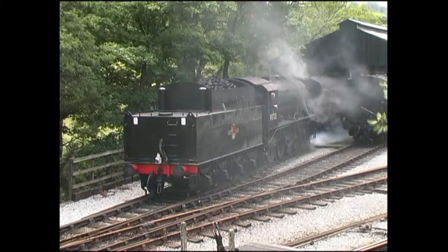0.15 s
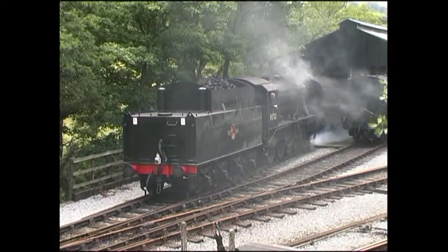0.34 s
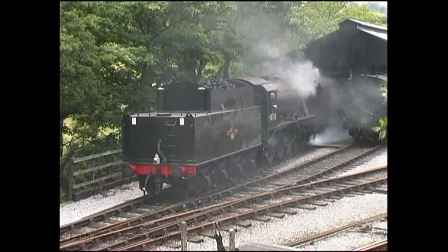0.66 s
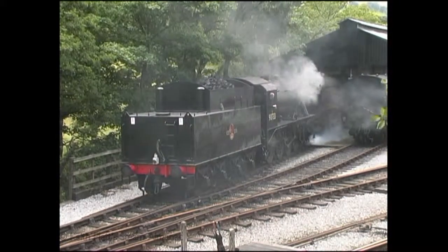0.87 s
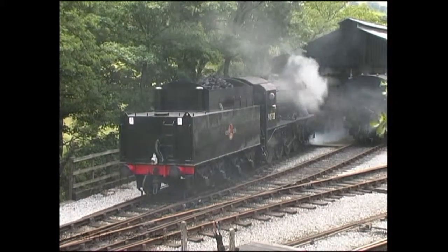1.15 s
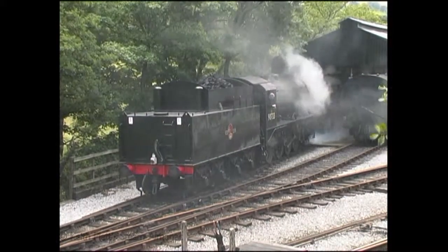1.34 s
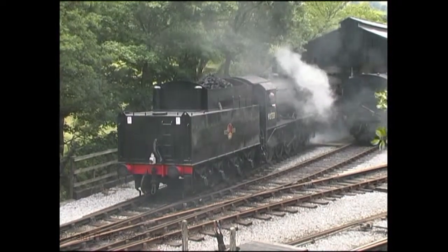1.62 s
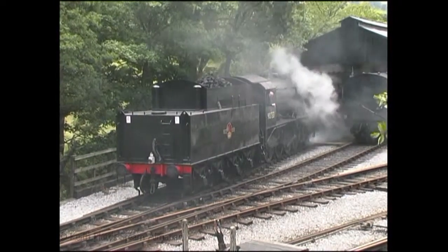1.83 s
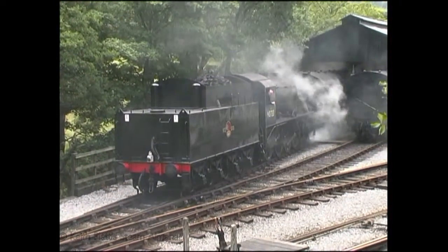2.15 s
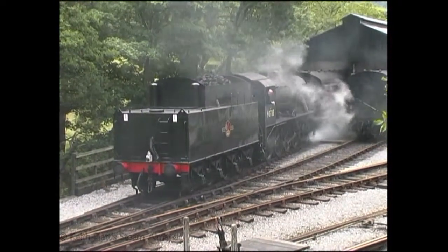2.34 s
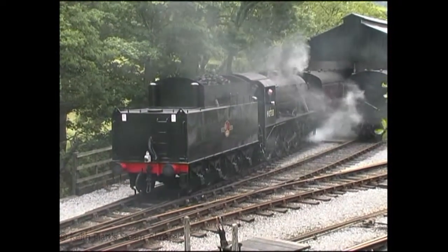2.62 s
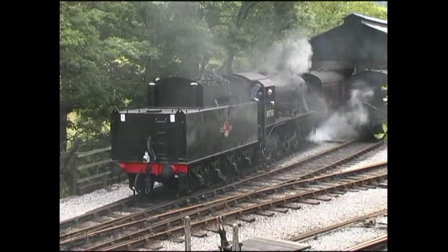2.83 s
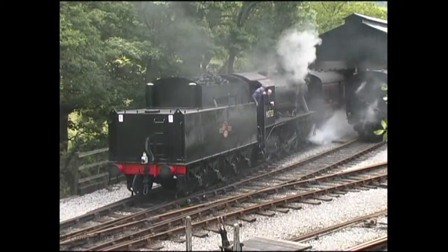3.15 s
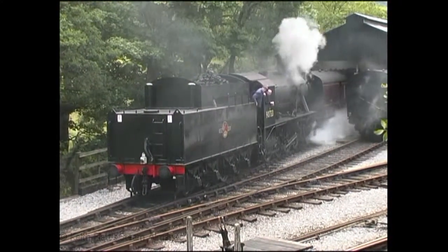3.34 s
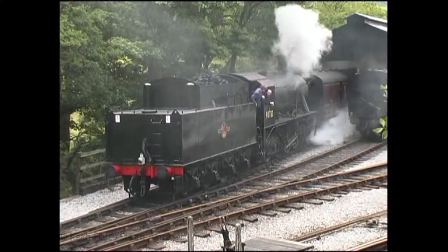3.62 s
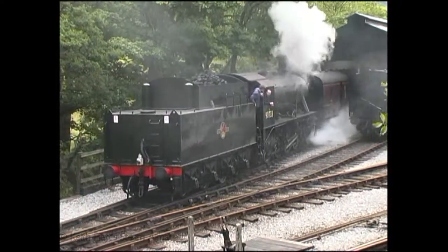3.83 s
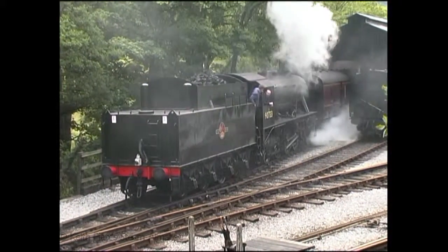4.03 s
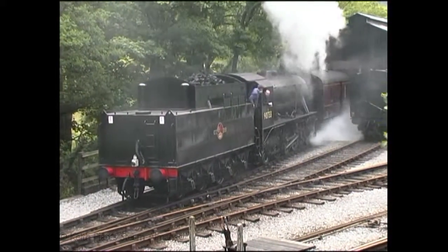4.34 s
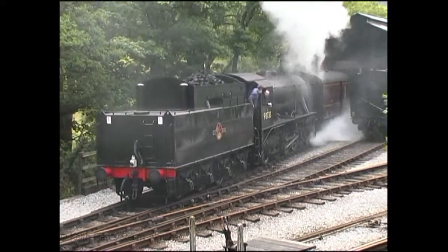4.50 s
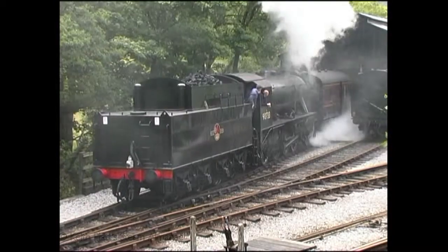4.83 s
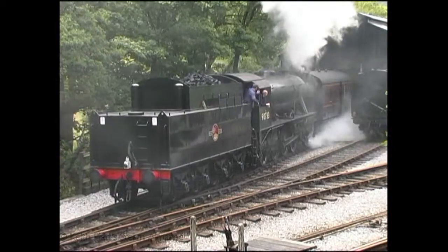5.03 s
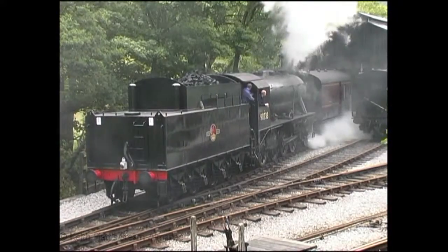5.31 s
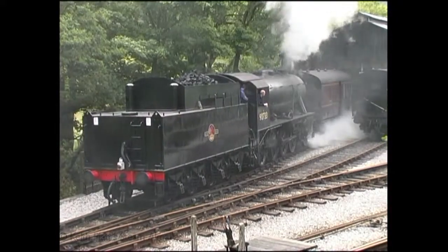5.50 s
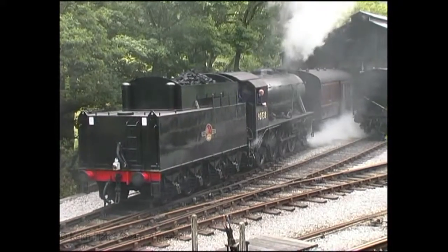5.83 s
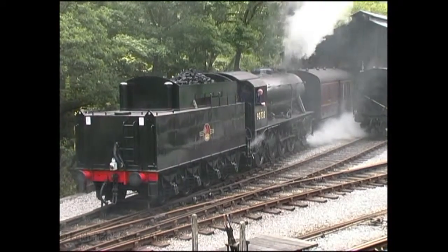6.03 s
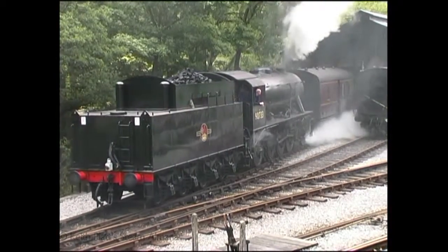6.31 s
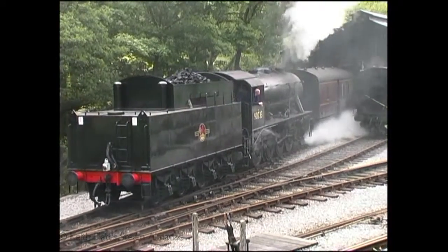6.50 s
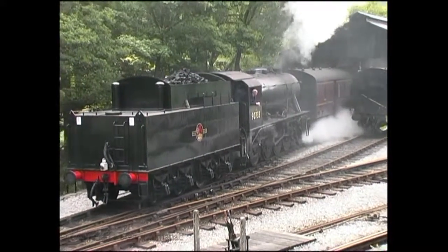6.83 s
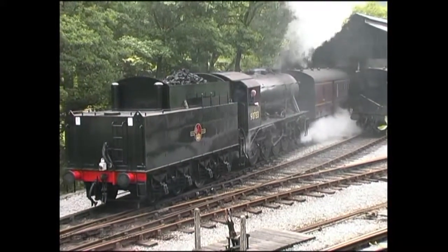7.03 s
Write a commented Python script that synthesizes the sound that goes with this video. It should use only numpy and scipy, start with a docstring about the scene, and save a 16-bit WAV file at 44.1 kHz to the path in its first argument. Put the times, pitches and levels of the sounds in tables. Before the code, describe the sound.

A steam locomotive, heard from some way off in a rail yard, lets out a loud, bright, turbulent hiss over a duller jet of steam. About halfway through, the bright hiss dies away while the duller one keeps blowing. The train creeps off with a quiet low wheel rumble and soft, irregular, humming knocks. Near the end a wheel flange gives a faint, very high squeal.

```python
"""Steam roars from a standing locomotive, some way off in a murmuring rail yard. A bright turbulent jet
from a boiler valve starts to close at 3.5 s; duller steam blows from the cylinder cocks throughout.
As the train creeps off, the wheels rumble over the rails, the frames judder in soft knocks that set
their modes humming, and a flange rubbing the rail briefly sings very high."""
import sys
import numpy as np
from scipy import signal
from scipy.fft import rfft, irfft, next_fast_len
from scipy.io import wavfile
from scipy.ndimage import uniform_filter1d, map_coordinates

SR = 44100
rng = np.random.default_rng(int(sys.argv[2]) if len(sys.argv) > 2 else 0)


def materialize(psi):
    """Save the field psi as 16-bit PCM at rate SR to the path in sys.argv[1].

    A 1-D psi becomes a single channel; in a 2-D psi each row is a channel.
    """
    bounded = np.clip(np.atleast_2d(psi).T, -1, 1)
    quanta = np.round(bounded * 32767).astype(np.int16)
    wavfile.write(sys.argv[1], SR, quanta)


N = 315756
TIME_S = np.arange(N) / SR


def amp(db):
    """Decibels to gain."""
    return 10 ** (np.asarray(db) / 20)


def unit(x):
    """Scale to rms 1."""
    return x / np.sqrt(np.mean(x ** 2) + 1e-20)


def along(points, hz):
    """Read (Hz, value) points on a log axis."""
    knots_hz, values = np.transpose(points)
    return np.interp(np.log(hz + 1), np.log(knots_hz + 1), values)


def curves(rows, at_s=TIME_S):
    """Interpolate each column after the time."""
    knots_s, *columns = np.transpose(rows)
    return [np.interp(at_s, knots_s, column) for column in columns]


def wobble(rate_hz):
    """Smooth random curve, rate_hz knots a second."""
    knots = rng.standard_normal(int(N * rate_hz / SR) + 4)
    return map_coordinates(knots, [TIME_S * rate_hz])


def field(shape, bins, frames):
    """Smooth random time-frequency surface, rms 1."""
    white = rng.standard_normal(shape)
    return unit(uniform_filter1d(uniform_filter1d(white, bins, 0), frames, 1))


def filtered(x, response):
    """Apply a complex frequency response."""
    size = next_fast_len(N + SR // 2)
    return irfft(rfft(x, size) * response(np.fft.rfftfreq(size, 1 / SR)), size)[..., :N]


def noise(spectrum):
    """Two independent noises of one colour, rms 1."""
    return unit(filtered(rng.standard_normal((2, N)), lambda hz: amp(along(spectrum, hz))))


def jet(spectrum, flow, pivot_hz, eddy_db, ripple_db, flutter_db, bands_hz=(), band_swell=()):
    """Turbulent steam: the hiss follows separate level and tilt curves; eddies patch its gain."""
    window = dict(nperseg=2048, noverlap=1536)
    hz, frame_s, spectra = signal.stft(noise(spectrum), SR, **window)
    hz = hz[:, None]
    level_db, tilt_db_per_oct = curves(flow, frame_s)
    gain_db = level_db + tilt_db_per_oct * np.log2(np.maximum(hz, 600) / pivot_hz)
    if bands_hz:
        for (centre_hz, half_width_hz), boost_db in zip(bands_hz, curves(band_swell, frame_s)):
            gain_db += boost_db * np.exp(-((hz - centre_hz) / half_width_hz) ** 2)
    gain_db += eddy_db * field(gain_db.shape, bins=24, frames=4)
    gain_db += ripple_db * field(gain_db.shape, bins=3, frames=24)  # faint, slowly shifting tonal grain
    hiss = signal.istft(spectra * amp(gain_db), SR, **window)[1][:, :N]
    return amp(flutter_db * wobble(10)) * hiss


# Valve jet colour. Each row: frequency in Hz, relative density in dB.
VALVE_SPECTRUM = [(900, -90), (1500, -25), (2100, -11.5), (2600, -6), (3500, -2.5), (4100, -4),
                  (4700, -3.5), (5050, -6.5), (5350, -2), (6000, -3.5), (7000, -8), (8500, -13),
                  (10000, -20), (12000, -30), (14000, -41), (15600, -61)]
# Valve flow. Each row: time in seconds, level in dB, tilt in dB per octave.
VALVE_FLOW = [(0, -16.5, 2.2), (0.15, -16.5, 2.5), (0.43, -14, 4), (0.66, -15, 1), (0.81, -15.5, 0),
              (1.04, -15.5, 5.5), (1.18, -15, 2), (1.32, -16, 1.5), (1.6, -15.5, 4), (1.87, -17, 2),
              (2.03, -17, 4.5), (2.28, -17, -2), (2.45, -16.5, 1.5), (2.73, -18, 3), (2.93, -16, 2.5),
              (3.2, -16, 0.5), (3.5, -16.5, 0), (3.7, -20, 1.5), (4.1, -22.5, 1.5), (4.4, -25.5, -0.5),
              (4.85, -27, -2), (5.35, -30, -1.5), (5.55, -38.5, 3.5), (6.3, -34.5, 1.5), (7.16, -45, -5)]


def boiler_valve():
    """A bright jet that dies away as the valve closes."""
    return jet(VALVE_SPECTRUM, VALVE_FLOW, pivot_hz=4560, eddy_db=1.5, ripple_db=2.1, flutter_db=.5)


# Cock jet colour. Each row: frequency in Hz, relative density in dB.
COCK_SPECTRUM = [(300, -78), (600, -29), (850, -12.5), (950, -14.5), (1400, -8), (1580, -9.5),
                 (1980, -10.5), (2100, -5.5), (2700, -5), (3300, -6.5), (4900, -12.5), (6200, -15),
                 (8500, -29.5), (12000, -45), (15600, -60)]
# Cock flow. Each row: time in seconds, level in dB, tilt in dB per octave.
COCK_FLOW = [(0, -20.5, 2.5), (0.5, -23.5, 1.5), (1.1, -25, 1), (1.7, -23.5, 3), (2.25, -21, 1.5),
             (2.75, -19, 2), (3.25, -21.5, 1.5), (3.75, -23, 2), (4.05, -22.5, 2), (4.3, -24.5, -0.5),
             (4.65, -28, -2), (5.25, -26, -1.5), (5.5, -26, -0.5), (5.75, -24.5, -0.5), (6.0, -26, -0.5),
             (6.5, -26, 0), (7.16, -25, 0)]
# Drain pipe resonances. Each row: time in seconds, lower band gain in dB, upper band gain in dB.
PIPE_BAND_GAINS = [(0, 3, -4.5), (2.2, -1, -1), (4.0, 3.5, 0.5), (5.0, 2.5, 0.5), (5.7, 4, 1), (6.4, 5, 1),
                   (7.16, 3.5, 3.5)]


def cylinder_cocks():
    """A duller jet; its drain pipe favours two bands, which stand out more as the engine nears."""
    return jet(COCK_SPECTRUM, COCK_FLOW, pivot_hz=2190, eddy_db=.95, ripple_db=1.95, flutter_db=.22,
               bands_hz=[(2210, 155), (3600, 500)], band_swell=PIPE_BAND_GAINS)


# Background colour. Each row: frequency in Hz, relative density in dB.
MURMUR_SPECTRUM = [(12, -35), (20, -15.5), (167, -11), (293, -5.5), (330, -13.5), (406, -6.5), (470, -10),
                   (506, -5.5), (570, -9), (680, -13), (880, -20), (1500, -120)]
# Background swell. Each row: time in seconds, gain in dB.
MURMUR_SWELL = [(0, 2), (1.2, -1), (3.2, 2), (7.16, -10)]


def yard_murmur(base_db=-56):
    """Low murmur of the distant yard and trees."""
    swell_db, = curves(MURMUR_SWELL)
    return amp(base_db + swell_db) * noise(MURMUR_SPECTRUM)


# Colour of wheel rumble and frame thuds. Each row: frequency in Hz, relative density in dB.
RUMBLE_SPECTRUM = [(18, -47), (30, -27), (69, -4.5), (156, -1), (211, 2), (259, 1), (294, -2.5), (346, -4),
                   (398, -5), (435, 0), (620, -14.5), (810, -50), (1360, -120)]
# Wheel rumble. Each row: time in seconds, level in dB.
WHEEL_LEVELS = [(3.45, -75), (3.72, -54.5), (4.3, -51), (4.62, -40), (4.72, -41.5), (4.95, -52),
                (5.15, -42.5), (5.38, -50.5), (5.68, -40.5), (5.82, -46.5), (6.12, -43.5), (6.3, -47),
                (6.55, -49), (6.75, -53), (7.16, -47.5)]
# Ground rumble colour. Each row: frequency in Hz, relative density in dB.
GROUND_SPECTRUM = [(18, -40), (30, -12), (60, -1), (110, -4), (170, -17), (300, -120)]
MOVE_OFF_S, ROLL_FREE_S, JUDDER_END_S = 3.69, 4.42, 6.6


def rolling_wheels(ground_db=-64, nearing_db_per_s=2):
    """Wheels grind over the rails in lumps; the ground rumble grows as the engine nears."""
    moving_s = TIME_S - MOVE_OFF_S
    ground = (moving_s > 0) * amp(ground_db + nearing_db_per_s * moving_s) * noise(GROUND_SPECTRUM)
    level_db, = curves(WHEEL_LEVELS)
    grind = unit(amp(3.5 * wobble(28)) * noise(RUMBLE_SPECTRUM))
    return amp(level_db) * grind + ground


# Judder slips. Each row: start in seconds, level in dB, third mode over second in dB.
JUDDER_SLIPS = [(3.69, -40, -7), (3.767, -47, -1), (3.859, -41, -5), (3.935, -45, 0), (4.076, -41, -3),
                (4.149, -60, 8), (4.221, -39.5, 1), (4.299, -64, 3), (4.373, -40, -2), (4.443, -39, -1),
                (4.491, -40, 0), (4.522, -34, -5), (4.579, -36, -8), (4.609, -44, -5), (4.645, -39, -1),
                (4.699, -36, -8), (4.819, -42, -11), (5.069, -41, -4), (5.153, -37, -1), (5.213, -44, 16),
                (5.267, -50, -2), (5.499, -50, -2), (5.577, -40, 8), (5.624, -44, -1), (5.709, -44, 2),
                (5.819, -43.5, -16), (5.929, -40, -11), (6.029, -44, -7), (6.084, -32.5, 1),
                (6.221, -34, 0), (6.289, -51, 4), (6.359, -46, 0), (6.446, -54, 2), (6.532, -49, 5)]
# Frame modes. Each row: frequency in Hz, T60 in seconds, base wander in Hz, relative hum in dB.
FRAME_MODES = [(135, .16, 4, -5), (280, .16, 5, 0), (416, .2, 4, -1), (525, .12, 8, -12)]


def frame_knocks(low_mode_db=-3.5, top_mode_db=-5, thud_db=-6, scatter_db=1,
                 hum_db=-59, hum_fade_db_per_s=1.5):
    """Each slip of the judder is a soft push: a short thud, and fresh energy for the humming modes."""
    start_s, slip_db, tilt_db = np.transpose(JUDDER_SLIPS)
    age_s = np.arange(SR // 2) / SR

    def ramp(from_s, edge_s=.06):
        return np.clip((TIME_S - from_s) / edge_s, 0, 1)

    def envelope(level_db, t60_s, rise_s):
        pushes = np.bincount(np.round(start_s * SR).astype(int), amp(level_db), N)
        response = amp(-60 * age_s / t60_s) * (1 - np.exp(-age_s / rise_s))
        return signal.fftconvolve(pushes, response)[:N]

    juddering = ramp(MOVE_OFF_S) - ramp(JUDDER_END_S)
    hum = juddering * amp(hum_db - hum_fade_db_per_s * (TIME_S - MOVE_OFF_S))
    wander_scale = 2.6 ** ramp(ROLL_FREE_S)
    chance_db = scatter_db * rng.standard_normal((len(start_s), len(FRAME_MODES))).T
    shares_db = [low_mode_db + chance_db[0], -tilt_db / 2,
                 tilt_db / 2, tilt_db / 2 + top_mode_db + chance_db[3]]
    ring = np.zeros(N)
    for (hz, t60_s, wander_hz, held_db), share_db in zip(FRAME_MODES, shares_db):
        pitch_hz = hz + wander_hz * wander_scale * wobble(45)
        phase = 2 * np.pi * (np.cumsum(pitch_hz) / SR + rng.random())
        struck = envelope(slip_db + share_db, t60_s, rise_s=.004)
        held = hum * amp(held_db + 3.5 * wobble(14))
        ring += (struck + held) * np.sin(phase)
    shed_echo = .26 * np.pad(ring, (400, 0))[:N]
    thud = envelope(slip_db + thud_db, t60_s=.06, rise_s=.002) * noise(RUMBLE_SPECTRUM)
    return np.array([ring, shed_echo]) + thud


# Flange squeal. Each row: time in seconds, pitch in Hz, level in dB.
SQUEAL_PATH = [(5.15, 10400, -69), (5.4, 10250, -60), (5.7, 10050, -60), (5.84, 10000, -53),
               (6.0, 10150, -56), (6.17, 10280, -54), (6.35, 10300, -56), (6.7, 10300, -69)]


def flange_squeal():
    """A flange rubs the rail: narrow noise around a drifting pitch."""
    pitch_hz, level_db = curves(SQUEAL_PATH)
    carrier = np.sin(2 * np.pi * np.cumsum(pitch_hz) / SR)
    gain = amp(level_db + 1.8 * wobble(20))
    return gain * unit(carrier * np.array([wobble(330), wobble(330)]))


# Channel likeness. Each row: frequency in Hz, left-right coherence from 0 to 1.
STEREO_COHERENCE = [(40, .88), (90, 1), (300, 1), (345, .89), (430, 1), (580, 0.34), (730, 0.84), (1100, 1),
                    (1720, 0.76), (2150, 0.91), (3200, 0.75), (5000, 0.7), (7000, 0.5), (15000, 0.56)]
# Channel balance. Each row: frequency in Hz, left minus right level in dB.
STEREO_BALANCE = [(40, 1), (130, -1), (300, -2), (430, -4.5), (560, -9.5), (730, -2.5), (1290, -3.5),
                  (1720, -1), (2150, -2.5), (3200, -1.5), (5400, -3), (8600, 0.5), (15000, 1)]
# Channel phase. Each row: frequency in Hz, left minus right phase in radians.
STEREO_PHASE = [(40, 0), (300, -.5), (470, -.8), (560, -2.2), (605, -4.5), (730, -5.4), (1030, -5.9),
                (2150, -6.3), (6000, -6.1), (12000, -6.3)]


def stereo(pair):
    """Mix direct and scattered sound as mid and side, then offset channel level and phase."""
    def blend(hz):
        angle = np.arccos(np.clip(along(STEREO_COHERENCE, hz), -1, 1)) / 2
        return np.array([np.cos(angle), np.sin(angle)])

    def lean(hz):
        left = amp(along(STEREO_BALANCE, hz) / 2) * np.exp(.5j * along(STEREO_PHASE, hz))
        return np.array([left, 1 / left])

    mid, side = filtered(pair, blend)
    return filtered(np.array([mid + side, mid - side]), lean)


def scene():
    """Everything arrives from the same side of the yard."""
    steam = boiler_valve() + cylinder_cocks()
    motion = rolling_wheels() + frame_knocks() + flange_squeal()
    return stereo(steam + motion + yard_murmur())


def record(dry):
    """Round off the highest peaks, then band-limit."""
    ceiling, cutoff_hz = .97, 15628
    rounded = dry / (1 + np.abs(dry / ceiling) ** 8) ** (1 / 8)
    return filtered(rounded, lambda hz: hz < cutoff_hz)


dry = scene()
out = record(dry)
materialize(out)
```